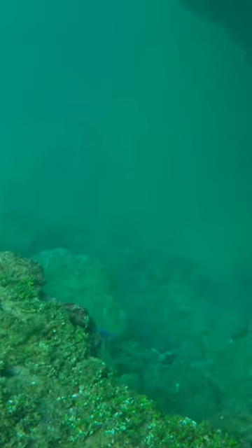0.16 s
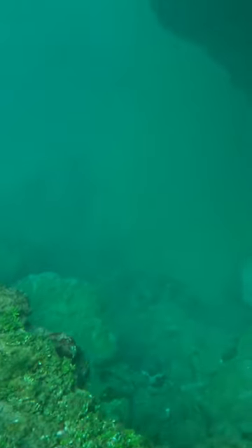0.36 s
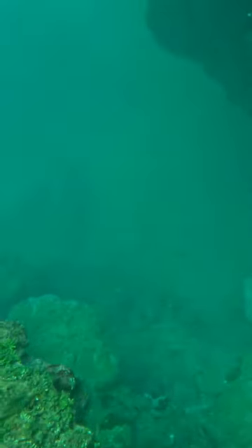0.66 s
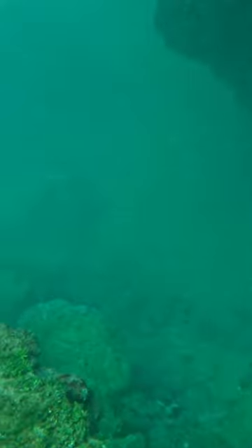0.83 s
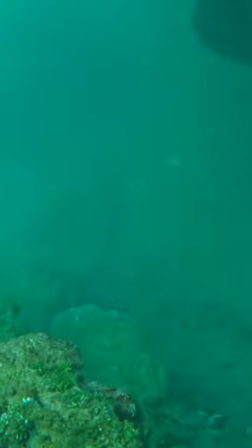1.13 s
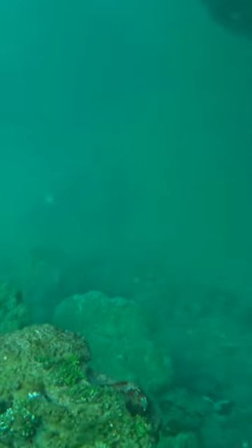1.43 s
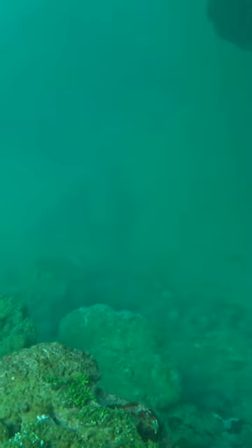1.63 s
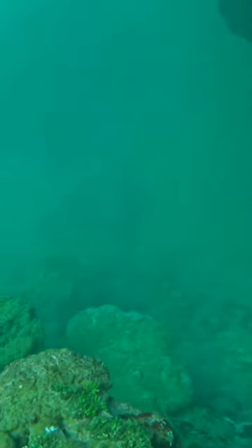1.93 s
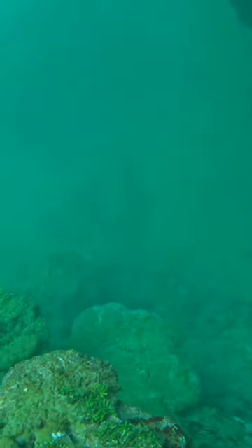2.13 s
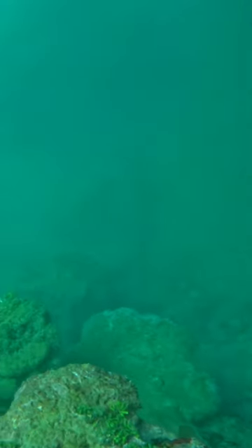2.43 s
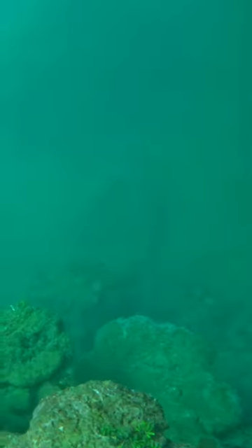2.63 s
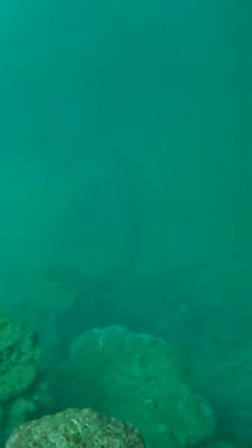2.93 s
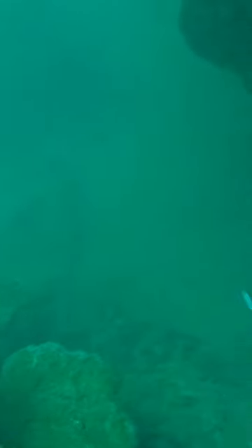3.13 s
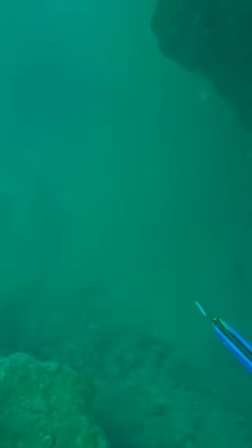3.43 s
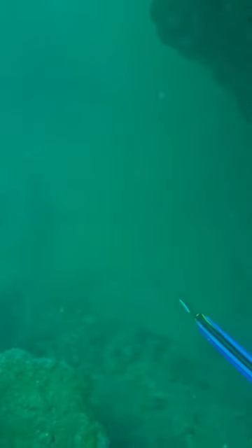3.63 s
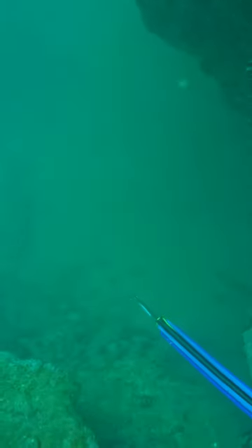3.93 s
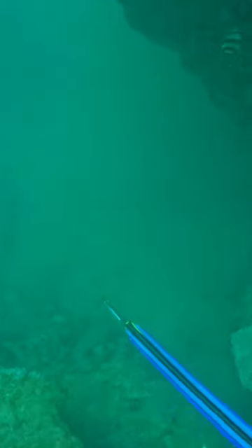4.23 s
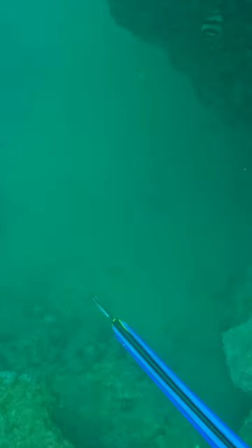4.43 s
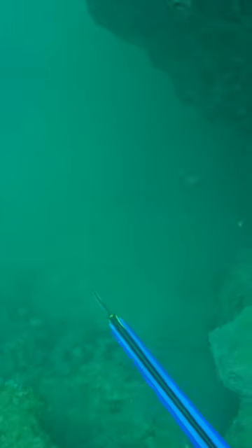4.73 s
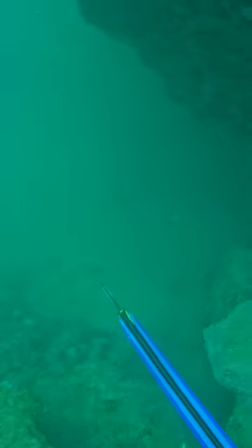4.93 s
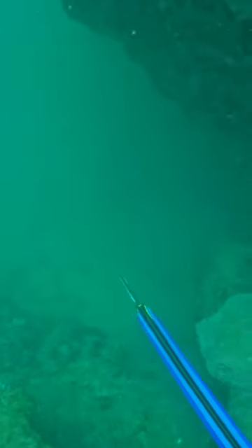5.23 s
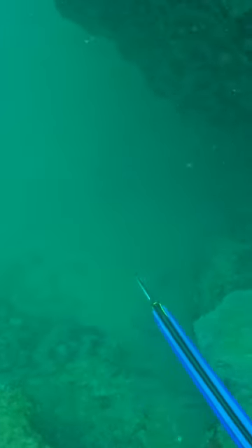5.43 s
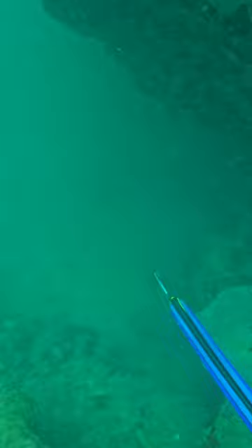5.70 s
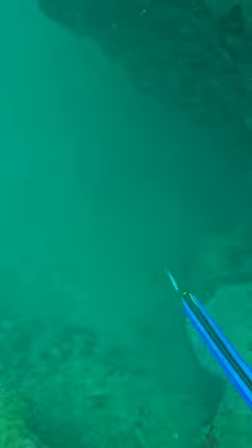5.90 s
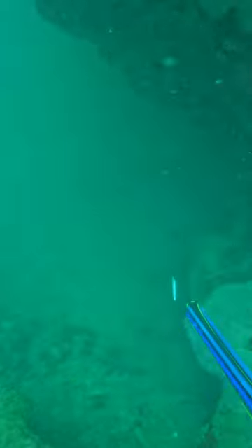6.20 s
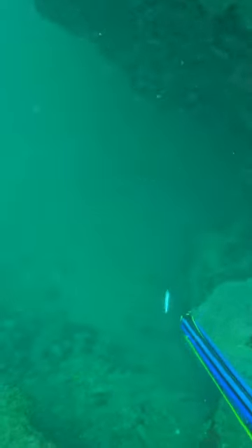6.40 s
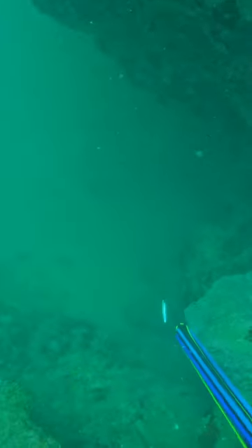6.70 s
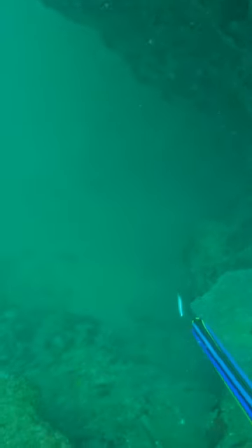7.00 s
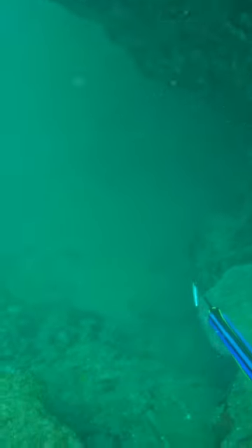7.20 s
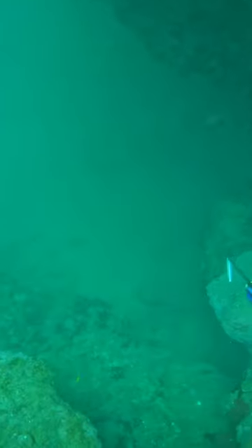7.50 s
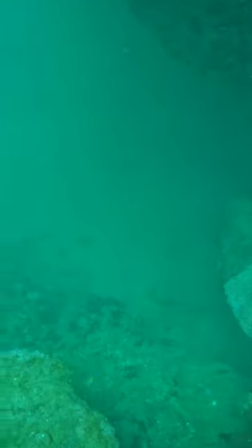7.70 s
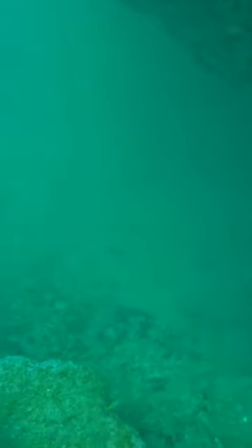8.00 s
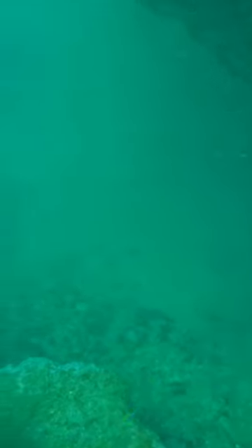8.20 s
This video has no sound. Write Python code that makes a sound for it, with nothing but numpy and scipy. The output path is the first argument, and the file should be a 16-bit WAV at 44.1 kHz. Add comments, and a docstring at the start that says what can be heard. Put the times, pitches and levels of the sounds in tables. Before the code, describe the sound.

Underwater on a murky reef, heard from inside a camera housing. It begins quiet, with low rumble, faint hiss and small muffled knocks. Shrimp snaps grow denser and sharper, with a few pops. A fish gives a run of short, low, raspy grunts around five seconds, then four much stronger ones close together at the end, over fuller crackle.

```python
"""Snapping reef inside a camera housing

Shrimp crackle all around: near snaps are noise bursts, far ones melt into steady noise. A fish grunts close by
in sinking tones with a noisy rasp. Knocks ring the housing wall, pops are a crack or tick with a falling low
swing, and moving water is coloured noise that rumbles and surges. The shrimp come through the housing's
resonances and the fish through its wall; two ports with hissing microphones hear it all, and the camera's
gain control ducks the loud moments."""
import sys
import numpy as np
from scipy import signal
from scipy.fft import rfft, irfft, next_fast_len
from scipy.io import wavfile
from scipy.ndimage import uniform_filter1d, map_coordinates

SR = 44100
rng = np.random.default_rng(int(sys.argv[2]) if len(sys.argv) > 2 else 0)


def bounce(signal):
    """Save signal as a 16-bit WAV file at the path given by the first command-line argument."""
    frames = np.transpose(np.atleast_2d(signal))
    limited = np.clip(frames, -1, 1)
    pcm = np.round(limited * 32767).astype(np.int16)
    wavfile.write(sys.argv[1], SR, pcm)


N = 368235

# near snaps and the cracks of a few pops, before the band rules:
# start_s, level_db, body_db and treble_db against the level
SNAPS_AND_CRACKS = [(0.0818, -41, -3.5, -39), (0.246, -39.5, -2, -35), (1.0206, -37.5, -25, -28),
                    (1.3698, -31, -18, -29), (1.4326, -31, -20, -41), (1.5125, -31, -33, -31),
                    (1.6125, -28, -24, -24), (1.6347, -25, -27, -14), (1.962, -30.5, -14.5, -30),
                    (2.0505, -27, -25, -33), (2.178, -26.5, -20.5, -25), (2.243, -38, -22, -33),
                    (2.2638, -31, -23, -33), (2.3128, -28.5, -28, -13.5), (2.4389, -26, -30, -25),
                    (2.5656, -24, -14, -30), (2.6249, -34, -20, -14), (2.7207, -42, -25, -26),
                    (2.7746, -35, -6.5, -27), (2.9868, -29.5, -18, -31), (3.0021, -24.5, -15.5, -38),
                    (3.0704, -33, -20, -34), (3.4156, -25.5, -22, -29), (3.4665, -25.5, -31, -30),
                    (3.4873, -23, -35, -31), (3.5775, -28.5, -18.5, -22), (3.7501, -18.5, -6, -37),
                    (3.8197, -24, -24, -25), (3.969, -29, -29, -37), (4.0587, -27, -28, -31),
                    (4.1878, -30.5, -5, -31), (4.3768, -30, -20, -34), (4.4178, -26, -24, -26),
                    (4.4363, -27, -21, -32), (4.5111, -26.5, -9.5, -37), (4.7067, -28.5, -25, -25),
                    (4.7653, -22.5, -29, -28), (4.7923, -26.5, -29, -37), (4.8729, -27, -19.5, -24),
                    (4.9664, -24.5, -7.5, -31), (5.001, -27, -17, -21), (5.02, -34, -18, -34),
                    (5.1153, -30.5, -17, -36), (5.1867, -21.5, -25, -27), (5.2505, -36, -36, -33),
                    (5.4043, -23, -25, -39), (5.478, -35, -12, -28), (5.4932, -22, -19.5, -30),
                    (5.5782, -24.5, -23, -25), (5.674, -22.5, -33, -43), (5.7137, -30, -12.5, -35),
                    (5.8144, -27, -19, -24), (5.893, -23, -24, -32), (6.0412, -34.5, -17, -35),
                    (6.1093, -10.5, -24.5, -33), (6.1846, -19, -34, -33), (6.253, -31, -34, -38),
                    (6.342, -24, -10.5, -28), (6.397, -28, -20, -35), (6.4526, -18.5, -7.5, -31),
                    (6.5236, -35, -34, -28), (6.5814, -28.5, -18, -22), (6.6184, -28, -14, -30),
                    (6.92, -24, -27, -25), (7.0115, -28, -13.5, -32), (7.0237, -25.5, -16, -40),
                    (7.0564, -35.5, 1, -35), (7.1424, -32, -18, -37), (7.1731, -33, -25, -36),
                    (7.2504, -31, -38, -24), (7.2654, -23.5, -27, -27), (7.3013, -38, -26, -31),
                    (7.481, -28, -31, -36), (7.4994, -29, -15, -34), (7.5148, -26, -11.5, -35),
                    (7.5288, -21.5, -22, -39), (7.5787, -23.5, -23, -16.5), (7.6575, -24, -17.5, -25),
                    (7.7156, -28, -24, -19), (8.1563, -18, -29, -21)]
# bands that a snap is built from: low_hz, high_hz
SNAP_BANDS = [(650, 2100), (2100, 4000), (4000, 8000), (8000, 16000)]
# how each band follows a snap: gain_db, db_per_body_db, db_per_treble_db, random_spread_db
SNAP_BAND_RULES = [(23, 1, 0, -1), (4.97, 0.32, 0, 5), (0, 0.01, -0.09, 1), (27, 0, 1, -0.5)]
# base level of the far crackle and hiss over time: time_s, level_db
REEF_LEVEL = [(0.0, -59), (0.5, -57), (0.81, -52.5), (1.65, -51), (2.49, -49), (3.6, -47), (4.16, -49),
              (4.88, -46.5), (5.4, -48.5), (5.91, -48.5), (6.6, -46), (7.0, -45.5), (7.6, -46), (8.35, -43)]
# housing resonances at each port: centre_hz, width_hz (at half amplitude), left_db, right_db
HOUSING_MODES = [(1010, 710, -33, -22), (1340, 204, -10, -1), (1734, 490, -1, -5.5), (2232, 75, 1.5, -41),
                 (2570, 1210, -3.5, -7), (3287, 346, 1, -16.5), (3767, 530, -6, -15), (4596, 590, -2.5, 2),
                 (5136, 660, -4.5, 0), (6300, 2290, -9, -9.5), (7630, 340, -17.5, -9.5),
                 (8940, 300, -24, -39), (10350, 940, -28, -39.5), (11850, 3200, -30.5, -29)]
# phase by which the right port leads the left: frequency_hz, lead_radians
PORT_LEAD = [(1100, 0.99), (1480, -0.45), (1650, -0.87), (2050, 1), (3000, 0.77), (3600, 0.0022),
             (4200, -0.049), (4500, -0.15)]
# near grunts: start_s, level_db, first_pitch_hz, length_s, mid_hz, mid_db, top_hz, top_db, rasp_db
GRUNTS = [(1.457, -18, 127, 0.012, 283, -19, 389, 13, -7), (4.731, -16.5, 133, 0.025, 226, 2, 321, 5.5, 4),
          (4.94, -15.5, 161, 0.014, 220, -1, 345, -8.5, -12),
          (5.146, -9.5, 108, 0.018, 212, 0.5, 427, -2.5, -7),
          (5.338, -8.5, 146, 0.016, 194, 0.5, 394, -13.5, -13.5),
          (5.545, -10, 142, 0.02, 201.5, 5, 444, -8, -11), (7.573, -25, 282, .03, 220, 0, 406, -12, -25),
          (7.588, -5, 187, 0.026, 217.6, 2, 314, -6, -8),
          (7.814, -2.5, 147.6, 0.023, 183, -3.5, 302, -31, -12),
          (8.027, -0.5, 153, 0.023, 231, -5.5, 392, -26, -14),
          (8.236, 0, 139, 0.024, 180, -9.5, 270, -26, -16)]
SAG = 0.636  # pitch that a grunt sinks towards, as a share of its first pitch
# dull thuds, perhaps far fish: start_s, level_db, pitch_hz
THUDS = [(0.047, -33, 137), (0.256, -30, 124), (1.409, -27.5, 121), (1.747, -27.5, 142),
         (1.879, -28.5, 159), (1.952, -29.5, 129), (3.094, -26, 126), (3.331, -23.5, 128),
         (3.642, -22.5, 157), (4.775, -8.5, 126), (5.778, -24.5, 190), (6.052, -23.5, 113),
         (6.17, -21, 156), (6.896, -23.5, 147), (7.232, -24, 206), (7.376, -17, 184), (7.538, -28, 132)]
# how low sound passes the wall, hardly at all above its first mode: frequency_hz, gain_db
WALL_PASS = [(30, 2), (330, -1.5), (430, 0), (475, -7.5), (530, -26), (640, -22.5), (730, -24.5),
             (830, -41.5), (2000, -76)]
# knocks on the wall: start_s, level_db, upper_modes_db
KNOCKS = [(0.428, -37.5, 7.5), (0.6195, -39, 4), (0.6646, -39, -7.5), (0.6836, -31, -1.5),
          (0.7088, -27.5, -7), (0.7783, -30.5, -8.5), (0.8187, -46, 11.5), (0.8478, -29.5, -10),
          (0.8681, -25.5, -7.5), (0.9762, -34, -3), (0.9946, -27, -6), (1.0733, -37, -10), (1.0885, -36, 8),
          (1.1055, -25.5, 0), (1.1917, -31, -8), (1.2067, -32.5, -9), (1.304, -43, -3), (1.3284, -28, 9),
          (2.01, -41, -1), (2.0281, -36, -8), (2.0397, -33.5, -9), (2.0511, -36.5, 6), (2.1073, -30.5, -8),
          (2.1208, -41, 11), (2.1837, -30, -2), (2.202, -48.5, 19), (2.274, -31.5, 2), (2.292, -41, 3),
          (2.371, -33, -3), (2.3943, -37, 6.5), (2.5485, -39, -2), (2.7195, -40, -4), (4.2385, -41, -13),
          (4.4428, -21.5, -23), (4.4982, -43, 1), (4.5338, -47.5, 9.5), (5.9015, -39, -34),
          (5.9841, -31.5, 5.5), (6.1015, -45.5, 12), (6.1497, -35.5, 4), (6.5436, -37, -6),
          (6.6816, -27.5, -21.5), (6.8045, -19, -26), (7.0677, -27, 4), (7.1988, -31.5, -12),
          (7.3365, -41, 7.5), (7.458, -42, 15), (7.493, -57, 20), (7.693, -41, -4), (8.099, -32.5, -7.5)]
# wall modes that a knock rings: pitch_hz, level_db, t60_s
WALL_MODES = [(427, 1, 0.032), (596, -4, .015), (722, -12, 0.037), (980, -18, 0.007), (290, -5.5, 0.016)]
# pops at the right port: start_s, level_db
POPS = [(2.7761, -17.5), (3.5326, -31), (3.9274, -35.5), (4.8575, -33), (4.9921, -15.5), (5.0019, -13.5),
        (5.0222, -17), (5.0753, -21), (5.4798, -17.5), (6.4987, -22.5)]
# base levels of the moving water over time: time_s, rumble_db, surge_db
FLOW = [(0.0, -38.5, -52), (0.14, -36.5, -59.5), (0.46, -37.5, -63.5), (1.16, -38.5, -59.5),
        (1.49, -21, -46.5), (1.53, -28.5, -61), (1.86, -40, -56.5), (2.04, -29.5, -48.5),
        (2.37, -36.5, -59), (3.44, -27.5, -56.5), (3.74, -33.5, -49.5), (3.86, -32, -54), (4.0, -35.5, -53),
        (4.4, -35, -56.5), (4.56, -34.5, -61), (4.67, -25, -59), (4.81, -25, -48.5), (5.14, -24.5, -63),
        (5.46, -21, -55), (5.65, -29.5, -58.5), (5.83, -36.5, -59), (6.51, -28, -56.5),
        (6.63, -34.5, -51.5), (7.32, -34, -54.5), (8.12, -30, -48), (8.35, -20.5, -48)]
# relative noise spectra of the water: frequency_hz, density_db (per Hz)
RUMBLE_COLOUR = [(7.1, 2.5), (12, 9.5), (22, 1.5), (49, -5.5), (76, -24), (113, -32), (160, -33),
                 (210, -41), (350, -120)]
SURGE_COLOUR = [(59, -35), (100, 2.5), (173, -6.5), (210, -3.5), (318, -13), (420, -7.5), (687, -32),
                (1000, -38), (1300, -38.5), (2200, -120)]
SWELL_COLOUR = [(60, -34), (110, -2.5), (300, -1.5), (350, -5), (430, 3.5), (480, -21.5), (540, -27),
                (1000, -51), (2000, -120)]
HEAVE_DB, HEAVE_S = -17, 0.041  # the water heaves with each grunt: level against the grunt, half length
# one swell that washes past: level at its crest, start and end of the crest, slopes either side
SWELL_DB, SWELL_FROM_S, SWELL_TO_S, SWELL_RISE_DB_PER_S, SWELL_FALL_DB_PER_S = -42.5, 3.76, 3.83, 40, 97
TOP_HZ = 15650  # nothing passes from here up


def shrimp():
    """Near snaps and far crackle of the colony through the housing, with each microphone's own hiss."""
    far = crackle(count=2200, spread_db=3.5, most_db=15, colour_db=11.5, t60=0.025)
    far = far + amp(-4.0) * rng.standard_normal(N)  # crackle melted into steady noise
    # each port's microphone adds its own hiss, strongest in the far treble
    noise = rng.standard_normal((2, N))
    middle = amp(-10) * band(noise, 900, 3300)
    treble = amp(1.0) * band(noise, 10700, 16500)
    hiss = amp(3.3 * wobble(40)) * (amp(-22.5) * noise + middle + treble)
    # the colony snaps in uneven flurries
    clumps_db = 0.63 * wobble(9) + 0.8 * wobble(15)
    reef_db = curves(REEF_LEVEL)[0] + clumps_db
    return housing(snaps_and_cracks()) + amp(reef_db) * unit(housing(far + hiss))


def snaps_and_cracks():
    """Each is a burst of noise with a fast onset and a quiet tail off the rocks, levelled band by band."""
    t = np.arange(900) / SR
    burst_and_tail = 1 / (1 + (t / .0022) ** 4) + amp(-21 - 60 * t / .06)
    shape = (1 - np.exp(-t / .0004)) * burst_and_tail
    gain_db, by_body, by_treble, chance_db = np.transpose(SNAP_BAND_RULES)
    tracks = np.zeros((len(SNAP_BANDS), N))
    for s, db, body_db, treble_db in SNAPS_AND_CRACKS:
        burst = shape * rng.standard_normal((len(gain_db), len(t)))
        # every burst carries the same energy before its level is set
        burst *= np.linalg.norm(shape) / np.linalg.norm(burst, axis=1, keepdims=True)
        band_db = db + gain_db + by_body * body_db + by_treble * treble_db
        band_db = band_db + chance_db * rng.standard_normal(len(gain_db))
        add(tracks, s, amp(band_db)[:, None] * burst)
    return sum(band(x, *edges) for x, edges in zip(tracks, SNAP_BANDS))


def crackle(count, spread_db, most_db, colour_db, t60):
    """Far snaps as decaying noise: many weak, few strong, each band of each snap at its own strength."""
    draw = rng.random((count, 6))
    place = (draw[:, 0] * N).astype(int)
    size_db = np.minimum(-spread_db * np.log(draw[:, 1] + 1e-9), most_db)
    puff = amp(-60 * np.arange(600) / SR / t60)
    out = np.zeros(N)
    for k, (lo_hz, hi_hz) in enumerate(SNAP_BANDS):
        snap_power = amp(2 * (size_db + colour_db * draw[:, 2 + k]))
        train = np.bincount(place, snap_power, N)
        # overlapping puffs add in power
        envelope = np.sqrt(np.abs(signal.fftconvolve(train, puff ** 2)[:N]))
        out += band(envelope * rng.standard_normal(N), lo_hz, hi_hz)
    return unit(out)


def housing(x):
    """Each port's answer: its steep modes add in power, and the ports do not move quite in step."""
    def gain(hz):
        power = 0
        for centre, width, left_db, right_db in HOUSING_MODES:
            mode = 1 / (1 + (2 * (hz - centre) / width) ** 2)
            power = power + (amp([[left_db], [right_db]]) * mode) ** 2
        return np.sqrt(power)

    # half of the lead turns each port, in opposite directions
    return filtered(causal(x, gain), lambda hz: np.exp(np.outer([-.5j, .5j], along(PORT_LEAD, hz))))


def fish():
    """A grunt is raspy beats of the swim bladder, falling in pitch and cut short; a thud is one soft beat."""
    out, t = np.zeros(N), np.arange(4000) / SR
    for s, db, first_hz, length, mid_hz, mid_db, top_hz, top_db, rasp_db in GRUNTS:
        pitch = first_hz * (SAG + (1 - SAG) * np.exp(-3.2 * t / length))
        hold = (1 - np.exp(-(t / .0018) ** 2)) / (1 + (t / length) ** 7)
        upper = amp(mid_db) * np.sin(2 * np.pi * mid_hz * t) + amp(top_db) * np.sin(2 * np.pi * top_hz * t)
        beat = np.sin(2 * np.pi * np.cumsum(pitch) / SR) + amp(2.5 - 15 * t / length) * upper
        rasp = amp(rasp_db) * unit(band(rng.standard_normal(len(t)), 110, 1400))
        # the rasp trails on after the tones are cut
        ragged = hold + amp(-3 - 60 * t / 0.12) * (1 - np.exp(-t / 0.0057))
        add(out, s, amp(db) * (hold * beat + ragged * rasp))
    for s, db, hz in THUDS:
        envelope = amp(db - 60 * t / 0.032) * (1 - np.exp(-t / 0.00096))
        add(out, s, envelope * np.sin(2 * np.pi * hz * t))
    return causal(out, lambda hz: amp(along(WALL_PASS, hz)))


def knocks():
    """Each knock peaks just after first contact with a dry tick and rings the wall modes at varied strengths."""
    out, t = np.zeros(N), np.arange(3000) / SR
    for s, db, upper_db in KNOCKS:
        chance_db, tune = rng.normal(0, 1.5, len(WALL_MODES)), rng.normal(1, .02)
        ring = np.zeros(len(t))
        for extra_db, (hz, level_db, t60) in zip(chance_db, WALL_MODES):
            mode_db = level_db + extra_db + upper_db * (hz > 550) - 60 * t / t60
            ring += amp(mode_db) * np.sin(2 * np.pi * tune * hz * t)
        # the duller a knock, the softer its contact
        contact_s = .0009 * amp(np.clip(-6.5 - upper_db, 0, 13))
        rise = 1 - np.exp(-(t / contact_s) ** 2)
        tick_db = upper_db / 2 - 6.5 - 60 * t / 0.016
        tick = amp(tick_db) * unit(band(rng.standard_normal(len(t)), 185, 1110))
        add(out, s, -amp(db) * rise * (ring + tick))
    return out


def pops():
    """A sharp tick whose pitch falls at once into one low swing; the left port hears it weak and dull."""
    out, t = np.zeros(N), np.arange(1500) / SR
    turns = .46 * np.log1p(t / .00024)  # cycles, ever slower
    swing = -np.sin(2 * np.pi * turns) * (0.55 + t / 0.0023) * amp(-60 * t / 0.043)
    for s, db in POPS:
        add(out, s, amp(db) * swing)
    return np.array([amp(-11.5) * band(out, 20, 1600), out])


def water():
    """Slow flow pushes both ports alike; surges gurgle in the wall's low mode; the swell is smoother."""
    t = np.arange(N) / SR
    rumble_db, surge_db = curves(FLOW)
    own = amp(-23) * coloured(RUMBLE_COLOUR, channels=2)
    rumble = coloured(RUMBLE_COLOUR) * amp([[-1.1], [1.1]]) + own
    heave = sum(amp(db + HEAVE_DB) * np.exp(-((t - s) / HEAVE_S) ** 2) for s, db, *_ in GRUNTS)
    surge = amp(surge_db) * wash(SURGE_COLOUR, apart_db=-4.5, lumpy_db=5.0)
    before_db = SWELL_RISE_DB_PER_S * np.maximum(SWELL_FROM_S - t, 0)
    after_db = SWELL_FALL_DB_PER_S * np.maximum(t - SWELL_TO_S, 0)
    swell = amp(SWELL_DB - before_db - after_db) * wash(SWELL_COLOUR, apart_db=-30.0, lumpy_db=1.3)
    return (amp(rumble_db + 1.28 * wobble(3)) + heave) * rumble + surge + swell


def wash(colour, apart_db, lumpy_db):
    """Low noise in lumps: one part shared by the ports, another of each port's own."""
    lumps = amp(lumpy_db * (wobble(22) + wobble(60)))
    return unit(lumps * (coloured(colour) + amp(apart_db) * coloured(colour, channels=2)))


def amp(db):
    """Decibels to gain."""
    return 10 ** (np.asarray(db) / 20)


def unit(x):
    """Scaled to rms 1."""
    return x / np.sqrt(np.mean(x ** 2) + 1e-20)


def curves(rows):
    """One value per sample for each column after the time."""
    s, *cols = np.transpose(rows)
    return [np.interp(np.arange(N) / SR, s, c) for c in cols]


def along(points, hz):
    """(Hz, value) points joined on a log frequency axis."""
    f, value = np.transpose(points)
    return np.interp(np.log(hz + 1), np.log(f + 1), value)


def wobble(rate):
    """A smooth random curve, rate knots a second."""
    return map_coordinates(rng.standard_normal(2000), [np.arange(N) * rate / SR])


def add(track, s, sound):
    """Mixes a sound in at a time in seconds."""
    part = track[..., round(s * SR):][..., :sound.shape[-1]]
    part += sound[..., :part.shape[-1]]


def band(x, lo_hz, hi_hz):
    """A steep causal band-pass."""
    return signal.sosfilt(signal.butter(3, [lo_hz, hi_hz], "band", fs=SR, output="sos"), x)


def filtered(x, response):
    """x times a response of frequency."""
    m = 2 * next_fast_len(N // 2 + 8192)  # padded, so that tails do not wrap round
    return irfft(rfft(x, m) * response(np.fft.rfftfreq(m, 1 / SR)), m)[..., :N]


def causal(x, gain):
    """x through a gain of frequency, with the minimum phase that follows from the cepstrum."""
    hz = np.fft.rfftfreq(4096, 1 / SR)
    cepstrum = irfft(np.atleast_2d(np.log(gain(hz) + 1e-6)))
    # folding the cepstrum forward in time leaves no sound before its cause
    cepstrum[:, 1:2048] *= 2
    cepstrum[:, 2049:] = 0
    impulse = irfft(np.exp(rfft(cepstrum)))
    return signal.fftconvolve(np.atleast_2d(x), impulse, axes=1)[:, :N]


def coloured(points, channels=1):
    """Noise of rms 1 with a (Hz, dB) spectrum."""
    return unit(filtered(rng.standard_normal((channels, N)), lambda hz: amp(along(points, hz))))


def scene():
    """All sources at the two ports."""
    return shrimp() + fish() + knocks() + pops() + water()


def record(dry):
    """Gain control ducks loud moments and recovers slowly; peaks are rounded off; the top treble fades out."""
    # power above the rumble, over the last 20 ms
    power = np.abs(uniform_filter1d(np.mean(band(dry, 49, 12000) ** 2, 0), size=881, origin=440))
    excess_db = np.maximum(10 * np.log10(power + 1e-12) + 15.75, 0) * .9
    recovery_db = 9.3 * np.arange(N) / SR  # 9.3 dB a second
    duck_db = np.maximum.accumulate(excess_db + recovery_db) - recovery_db
    # the gain glides over 27 ms
    ducked = dry * amp(-uniform_filter1d(duck_db, size=1201, origin=600))
    rounded = ducked / (1 + np.abs(ducked / .9) ** 8) ** (1 / 8)
    return filtered(rounded, lambda hz: (hz < TOP_HZ) / (1 + (hz / 14600) ** 24))


dry = scene()
out = record(dry)
bounce(out)
```